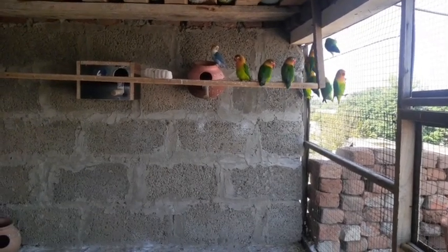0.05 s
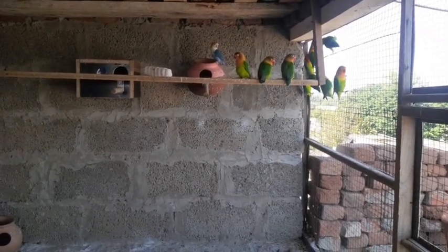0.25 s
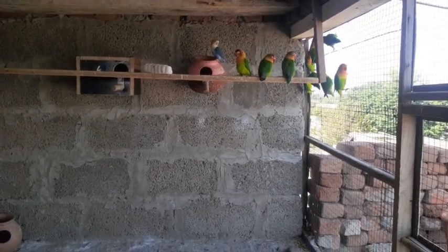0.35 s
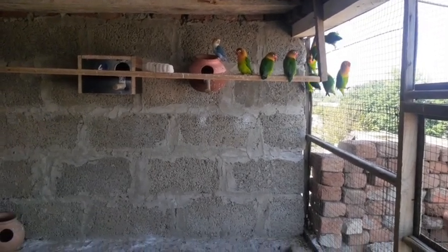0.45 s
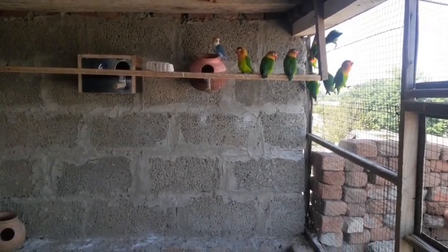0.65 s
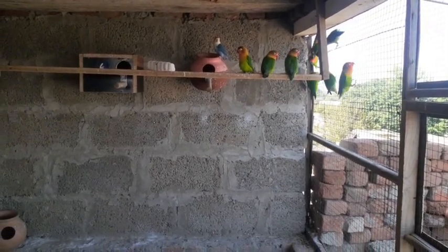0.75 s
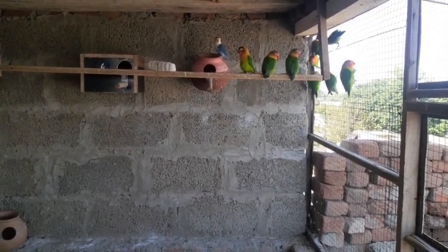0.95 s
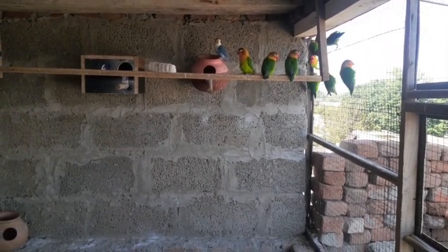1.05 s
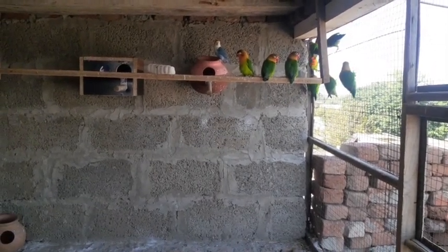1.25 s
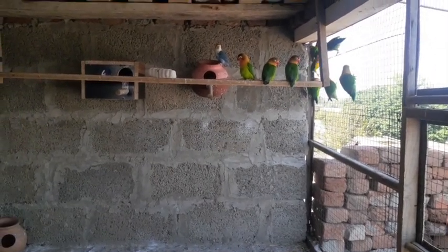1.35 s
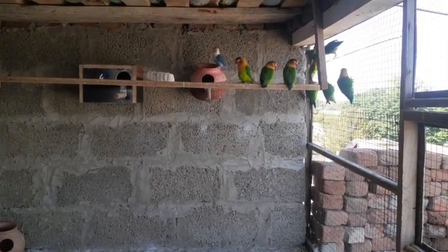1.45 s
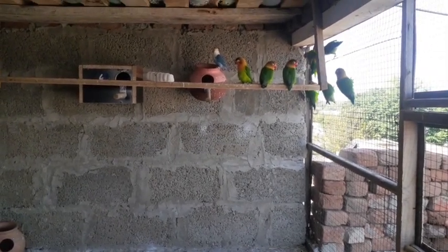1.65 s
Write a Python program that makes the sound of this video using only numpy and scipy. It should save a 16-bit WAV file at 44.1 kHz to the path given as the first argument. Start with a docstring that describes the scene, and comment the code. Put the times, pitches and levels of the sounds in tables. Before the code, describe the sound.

Lovebirds chirp in a quick, shrill run of peeps and screeches in a small aviary.

```python
"""A quick run of falling peeps, rasps and two shrill screeches: lovebirds on a perch to the right.
Faint rustles and one soft squawk follow. Each voice is a vibrating membrane, the syrinx; the rasps
are breath chopped into pulses. The block walls of a small aviary answer closely. Behind it all lie
outdoor rumble, a faint far whistle, a low hum and a thin steady whine."""
import sys
import numpy as np
from scipy import signal
from scipy.fft import rfft, irfft
from scipy.io import wavfile

SR = 44100
rng = np.random.default_rng(int(sys.argv[2]) if len(sys.argv) > 2 else 0)


def master_out(mix):
    """Clip the mix to full scale and print it as 16-bit PCM to the path in sys.argv[1]."""
    frames = np.transpose(np.atleast_2d(mix))
    ceiling = np.clip(frames, -1, 1)
    pcm = np.round(ceiling * 32767).astype(np.int16)
    wavfile.write(sys.argv[1], SR, pcm)


N = 74970
T = np.arange(N) / SR
CUTOFF_HZ = 15900


def from_db(db):
    """Decibels to gain."""
    return 10 ** (np.asarray(db) / 20)


def at_hz(points, hz):
    """Read a table on a log-frequency axis."""
    freqs, values = np.transpose(points)
    return np.interp(np.log(hz), np.log(freqs), values)


def shaped_noise(gain):
    """Noise with a given gain at each frequency, scaled to rms 1."""
    freqs = np.arange(N // 2 + 1) * SR / N + 1e-3
    noise = irfft(rfft(rng.standard_normal(N)) * gain(freqs), N)
    return noise / noise.std()


def wobble(hz):
    """Random motion up to about this speed."""
    return shaped_noise(lambda f: 1 / (1 + (f / hz) ** 4))


def envelope(start, length, db, swell_db, attack_s=.003, release_s=.004):
    """Attack, a hold that slopes by swell_db, release."""
    progress = np.clip((T - start) / length, 0, 1)
    gate = np.clip((T - start) / attack_s, 0, 1) * np.clip((start + length - T) / release_s + .5, 0, 1)
    return np.sin(gate * np.pi / 2) ** 2 * from_db(db + swell_db * (progress - .5))


def syrinx(hz, rough, partials, jitter=.13, shimmer=.35, scatter_hz=700):
    """A vibrating membrane whose pitch and strength scatter as roughness goes from 0 to 1."""
    phase = 2 * np.pi * np.cumsum(hz * (1 + jitter * rough * wobble(scatter_hz))) / SR
    wave = sum(from_db(db) * np.sin(k * phase) * (k * hz < SR / 2) for k, db in partials)
    return np.sqrt(2) * wave * (1 + shimmer * rough * wobble(scatter_hz))


# Tone of the outdoor bed. Each row: frequency in Hz, relative level in dB.
AIR_COLOUR = [(20, -32.5), (48, 0), (72, -3), (110, -6.5), (190, -3), (260, -11.5), (310, -4), (380, -14),
              (520, -8), (680, -9), (1300, -16), (2500, -17.5), (3500, -28.5), (5500, -28.5), (9500, -35),
              (11300, -31), (12800, -9.5), (14000, -25.5), (16000, -31.5)]
# Its stereo image. Each row: frequency in Hz, left-right likeness (1 is mono).
AIR_LIKENESS = [(60, .95), (150, .88), (300, .72), (1000, .5), (8000, .3)]
# Its fader ride. Each row: time in seconds, gain in dB.
AIR_SWAY = [(0, 2.5), (.2, -6), (.45, 4), (.8, -2.5), (.95, -2.5), (1.12, 0), (1.25, -5), (1.36, -6.5),
            (1.45, 3.5), (1.6, -2.5), (1.7, 1)]

def outdoor_air():
    """A swaying rumble and hiss, centred in the bass and wide in the treble."""
    def layer(sign):
        return shaped_noise(
            lambda f: from_db(at_hz(AIR_COLOUR, f)) * np.sqrt(1 + sign * at_hz(AIR_LIKENESS, f)))
    mid, side = layer(1), layer(-1)
    return np.array([mid + side, mid - side]) * from_db(-62 + np.interp(T, *np.transpose(AIR_SWAY)))


# Pitches in Hz of the hum, the whine and the whine's third harmonic.
DRONE_HZ = [100, 4290, 12880]
# The same three tones. Each row: level in dB, pitch waver in Hz, flutter as a share of the amplitude.
DRONES = [(-69, 1.5, .2), (-76, 8, .25), (-66, 14, .3)]

def hum_and_whine():
    """Steady low and high tones with a slight waver and flutter."""
    out = 0
    for hz, (db, waver, flutter) in zip(DRONE_HZ, DRONES):
        phase = 2 * np.pi * np.cumsum(hz + waver * wobble(41)) / SR
        out = out + from_db(db) * np.sqrt(2) * np.sin(phase) * (1 + flutter * wobble(40))
    return out


# Dull swells. Each row: start in seconds, length in seconds, centre in Hz, peak level in dB.
SWELLS = [(0.351, 0.15, 528.6, -64.5), (.89, 0.11, 565, -62.5), (0.873, 0.21, 185, -64.5),
          (1.094, 0.15, 720, -66.5), (1.253, 0.295, 170.1, -63.5), (1.392, .24, 75, -61)]

def outdoor_swells():
    """Faint bands of low noise that rise and sink outside."""
    out = 0
    for start, length, centre, db in SWELLS:
        arch = np.sin(np.pi * np.clip((T - start) / length, 0, 1))
        band = shaped_noise(lambda f: 1 / (1 + ((f - centre) / (.4 * centre)) ** 4))
        out = out + from_db(db) * arch * band
    return out


# Path of the far whistle. Each row: time in seconds, pitch in Hz, level in dB.
WHISTLE_PATH = [(.43, 1030, -79), (0.489, 1025, -63), (.53, 1027, -52.5), (0.589, 995, -59),
                (.65, 930, -68), (.71, 885, -67.5), (.74, 872, -80)]

def far_whistle():
    """A thin falling whistle from outside."""
    times, hz, db = np.transpose(WHISTLE_PATH)
    level = from_db(np.interp(T, times, db)) * (T > times[0]) * (T < times[-1])
    return level * syrinx(np.interp(T, times, hz), rough=.059, partials=[(.99, 0)])


# Feathers and feet. Each row: start in seconds, length before the fade in seconds, level in dB.
RUSTLES = [(0.03, 0.016, -52), (0.722, 0.1, -65), (0.834, 0.054, -56.5), (0.959, 0.014, -69),
           (1.02, .04, -70), (1.109, 0.011, -56.5), (1.15, 0.01, -72), (1.364, 0.0027, -63),
           (1.481, .015, -57.5), (1.562, 0.052, -70), (1.624, 0.014, -61)]
# Their tone. Each row: frequency in Hz, relative level in dB.
RUSTLE_COLOUR = [(200, -29), (700, 5), (1400, -2), (2700, 3), (4000, -1.5), (5800, 5), (8000, -14.5),
                 (13000, -12.5), (16000, -38)]

def rustles(rise_s=.007, fade_s=.022):
    """Soft grainy brushes as the birds shift, each with a short fade."""
    level = 0
    for start, length, db in RUSTLES:
        rise = np.clip((T - start) / rise_s, 0, 1)
        fade = np.exp(-np.maximum(T - start - length, 0) / fade_s)
        level = level + from_db(db) * rise * fade
    brush = shaped_noise(lambda f: from_db(at_hz(RUSTLE_COLOUR, f)))
    grain = from_db(1.95 * wobble(160))
    return level * brush * grain


def reverb(voices, t60_s, treble_t60_s, split_hz=7300, build_s=.0037):
    """Dense reflections that build quickly and die away, treble first."""
    noise = rng.standard_normal(N)
    dull = signal.sosfiltfilt(signal.butter(2, split_hz, fs=SR, output="sos"), noise)
    response = dull * from_db(-60 * T / t60_s) + (noise - dull) * from_db(-60 * T / treble_t60_s)
    response *= 1 - np.exp(-T / build_s)
    return signal.fftconvolve(voices, response / np.linalg.norm(response))[:N]


# Slaps off the block walls. Each row: delay in seconds, right gain in dB, left gain in dB.
WALL_ECHOES = [(.0052, -12, -8), (0.011, -18.5, -24.5), (.021, -20, -28.5), (0.032, -21, -22)]
# EQ on the left ear. Each row: frequency in Hz, gain in dB.
LEFT_EQ = [(1200, 4.5), (2500, -3.5), (4200, -1.5), (6000, -12.5), (9000, -1.5), (13000, 2)]

def aviary(voices, ear_lag_s=.000308):
    """Direct sound from the right, a few wall echoes, a short ring and a faint tail."""
    freqs = np.arange(N + 1) * SR / (2 * N)
    def delayed(seconds):
        return irfft(rfft(voices, 2 * N) * np.exp(-2j * np.pi * freqs * seconds))[:N]
    ears = np.array([from_db(-14) * delayed(ear_lag_s), voices])
    for delay, right_db, left_db in WALL_ECHOES:
        ears += from_db([[left_db], [right_db]]) * delayed(delay)
    for ear, ring_db in enumerate((-17, -6)):  # left, right
        ring = from_db(ring_db) * reverb(voices, t60_s=.11, treble_t60_s=.09)
        tail = from_db(-34) * reverb(voices, t60_s=.66, treble_t60_s=.33)
        ears[ear] += ring + tail
    ears[0] = irfft(rfft(ears[0], 2 * N) * from_db(at_hz(LEFT_EQ, freqs + 1)))[:N]
    return ears


# EQ on the raspy hiss: strong up to 6 kHz, a dip at 10 kHz, a lift at 13 kHz.
# Each row: frequency in Hz, gain in dB.
HISS_EQ = [(1500, -3.5), (2500, 1.5), (5000, 2), (6200, 3), (7500, -12), (10000, -23), (13000, -6.5),
           (16000, -18.5)]

def raspy_hiss(low_hz, high_hz=CUTOFF_HZ):
    """A band of bright hiss, falling steeply beyond two edges."""
    return shaped_noise(
        lambda f: from_db(at_hz(HISS_EQ, f)) / (1 + (low_hz / f) ** 8) / (1 + (f / high_hz) ** 8))


# Path of the squawk. Each row: time in seconds, pitch in Hz, level in dB, roughness from 0 to 1.
SQUAWK_PATH = [(1.394, 1837, -64, .4), (1.400, 1746, -42.5, 0.07), (1.414, 1464, -41.5, 0.3),
               (1.431, 1405, -39, 0.2), (1.441, 1391, -60, 0.25), (1.459, 1435, -47, 0.2),
               (1.478, 1336, -48.5, 0.17), (1.484, 1360, -76, 0.29)]
# Its harmonics. Each row: multiple of the pitch, relative level in dB.
SQUAWK_PARTIALS = [(1, -5), (2, -2), (3, -13.5), (4, -9.5), (5, -21.5), (6, -27), (7, -26), (8, -20.5),
                   (9, -23), (10, -27), (11, -23)]

def squawk(throat_hz=5500):
    """A soft, hoarse falling call, rich in harmonics; the throat lifts the upper middle."""
    times, *columns = np.transpose(SQUAWK_PATH)
    hz, db, rough = [np.interp(T, times, column) for column in columns]
    voice = syrinx(hz, rough, SQUAWK_PARTIALS) + from_db(-12) * raspy_hiss(low_hz=1500)
    resonance = from_db(2) * signal.lfilter(*signal.iirpeak(throat_hz, Q=5, fs=SR), voice)
    return (voice + resonance) * from_db(db) * (T > times[0]) * (T < times[-1])


# Hoarse onsets. Each row: start and length in seconds, level and swell in dB, low and high edge in Hz.
RASPS = [(0.108, 0.017, -37, 8.5, 1450, 6040), (0.211, 0.02, -44, 8, 1650, 5100),
         (0.226, 0.021, -32, 1, 2200, 14930), (0.379, 0.036, -35, 5, 5500, 16200),
         (0.395, .024, -26.5, -1.5, 4500, 13000), (0.429, .022, -26.5, -4.5, 2700, 15200),
         (0.5, 0.054, -26, 9, 2393, 14500), (1.396, 0.0099, -36, 1, 4460, 15740)]

def rasps(pulses_per_s=480):
    """Air chopped by uneven pulses of the syrinx."""
    rate = pulses_per_s * (1 + .27 * wobble(180))
    pulses = 1 + np.sin(2 * np.pi * np.cumsum(rate) / SR)
    hiss = sum(envelope(start, length, db, swell, attack_s=.0077) * raspy_hiss(low, high)
               for start, length, db, swell, low, high in RASPS)
    return hiss * pulses / np.sqrt(3 / 2)  # the chopping leaves the rms unchanged


# Two shrill accents. Each row: start and length in seconds, first, top and last pitch in Hz,
# level in dB, roughness from 0 to 1.
SCREECHES = [(.399, .035, 4195, 6136, 5524, -12.5, .2), (0.509, 0.025, 4883, 5942, 5284, -16, .35)]

def screeches():
    """The pitch of the syrinx shoots up, rounds over and sags."""
    partials = [(.97, 0), (2, -14)]  # the fundamental sits 3% under the written pitch
    out = 0
    for start, length, first, top, last, db, rough in SCREECHES:
        arc = np.clip(2 * (T - start) / length - 1, -1, 1)
        hz = top - (top - np.where(arc < 0, first, last)) * arc ** 2
        level = envelope(start, length, db, swell_db=-7, attack_s=.009)
        out = out + level * syrinx(hz, rough, partials)
    return out


# The run of peeps. Each row: start and length in seconds, first and last pitch in Hz,
# level and swell in dB, roughness from 0 to 1, overtone gain in dB.
PEEPS = [ (.000, 0.0047, 4660, 4770, -39.5, -5, 0.11, -9), (0.041, 0.028, 4472, 4047, -26, 3, 0.12, -18.5),
         (.124, 0.0076, 2646, 2430, -34, -2.5, .3, -22), (.134, .028, 4305, 3935, -25, -2, 0.14, -20.5),
         (.229, 0.0091, 2538, 2398, -29, 2.5, .5, -18), (.235, 0.015, 4992, 4330, -19, 5, 0.57, -16.5),
         (.251, 0.02, 4205, 3874, -23.5, -5.5, 0.26, -18.5), (0.31, 0.0067, 1906, 1950, -50.5, 6, .1, -8),
         (0.32, .022, 3623, 3453, -28.5, 5.5, 0.12, -22), (.332, 0.032, 4091, 3716, -19.5, -0.5, .14, -28),
         (.362, 0.026, 3770, 3444, -31.5, -5, .15, -20.5), (.386, 0.042, 3570, 3480, -33, -10, .22, 1),
         (0.432, 0.013, 2866, 3220, -33, 1.5, 0.3, -8), (.435, 0.016, 4704, 4200, -20.5, 3.5, .45, -12.5),
         (.451, .026, 4100, 3957, -22.5, -6.5, .25, -19.5),
         (0.473, 0.0049, 2203, 2100, -33, -0.5, 0.2, -19), (.48, 0.0262, 3895, 3750, -27.5, 18, .2, -11.5),
         (0.506, .018, 4796, 4690, -16, 1, 0.18, -14.5), (0.527, 0.024, 2663, 3079, -26, 6, .15, -10),
         (.543, 0.028, 4966, 4550, -17, 4.5, 0.38, -17.5), (.584, 0.013, 4543, 4368, -19, 3, 0.1, -29),
         (0.597, 0.016, 4400, 4320, -36.5, -14, 0.1, -15)]
# EQ on their overtones. Each row: frequency in Hz, gain in dB.
OVERTONE_EQ = [(5000, 1.5), (7200, 0), (8600, -1), (10300, -15), (11600, 3.5), (13000, 2), (14200, -10.5),
               (16000, -16.5)]

def peeps():
    """Short, nearly pure notes of the syrinx, most of them gliding down."""
    out = 0
    for start, length, first, last, db, swell, rough, overtone_db in PEEPS:
        hz = np.interp(T, [start, start + length], [first, last])
        partials = [(.99, .012)]  # the fundamental sits 1% under the written pitch
        partials += [(k, overtone_db + at_hz(OVERTONE_EQ, k * hz)) for k in (2, 3, 4)]
        out = out + envelope(start, length, db, swell) * syrinx(hz, rough, partials)
    return out


def scene():
    """The flock in its aviary, with wide rustles, over the outdoor bed."""
    flock = aviary(peeps() + screeches() + rasps() + squawk())
    return (flock + far_whistle() + np.array([rustles(), rustles()])
            + outdoor_swells() + outdoor_air() + hum_and_whine())


def record(dry):
    """A steep low-pass takes off the very top."""
    return signal.sosfilt(signal.ellip(12, .1, 90, CUTOFF_HZ, fs=SR, output="sos"), dry)


dry = scene()
out = record(dry)
master_out(out)
```